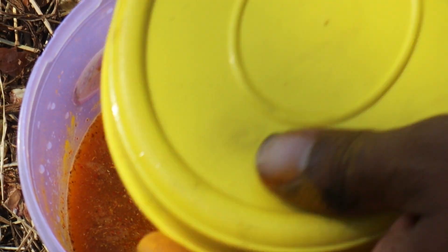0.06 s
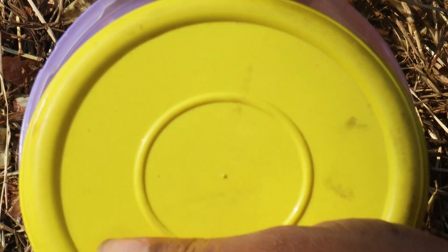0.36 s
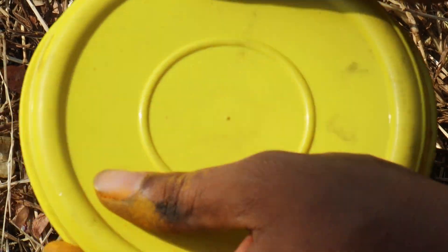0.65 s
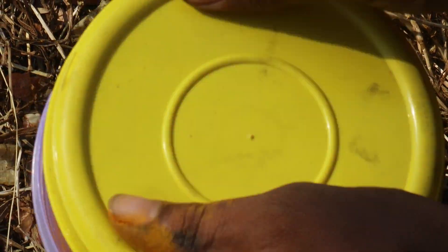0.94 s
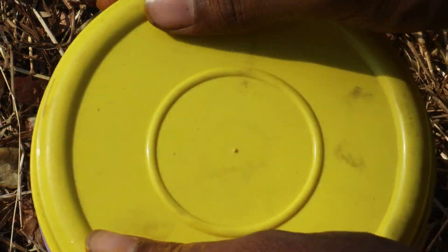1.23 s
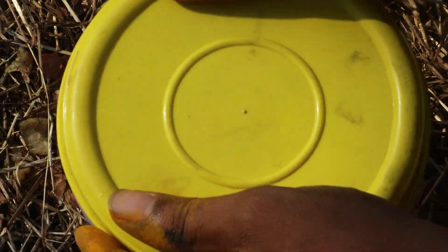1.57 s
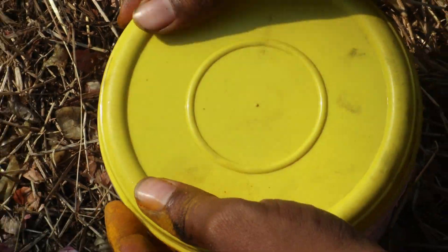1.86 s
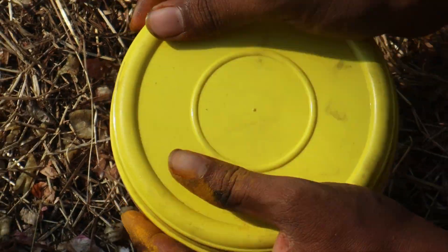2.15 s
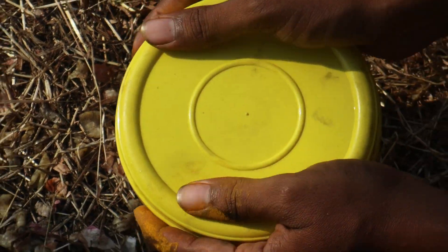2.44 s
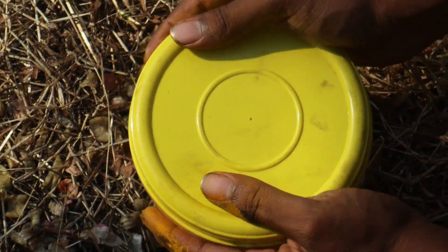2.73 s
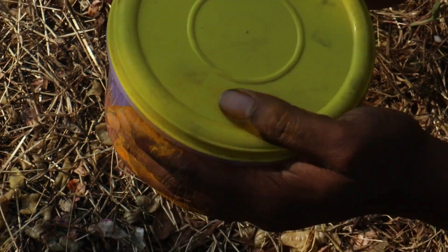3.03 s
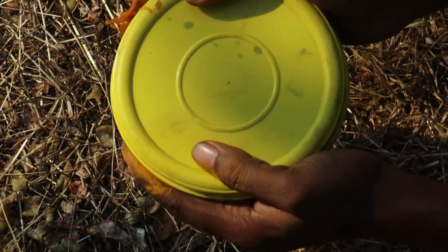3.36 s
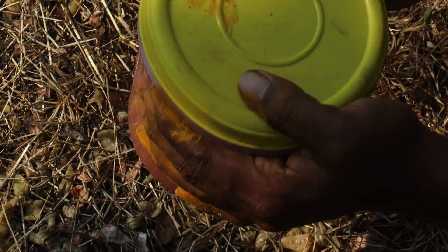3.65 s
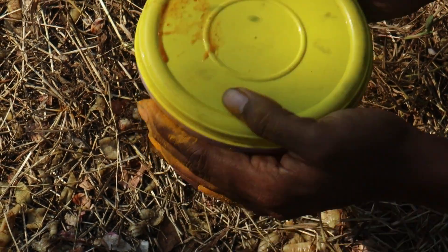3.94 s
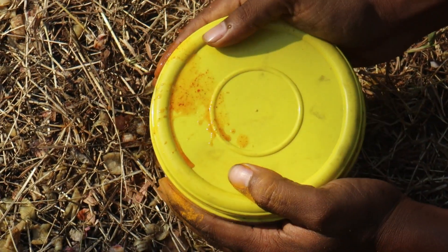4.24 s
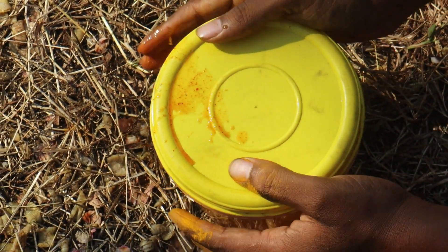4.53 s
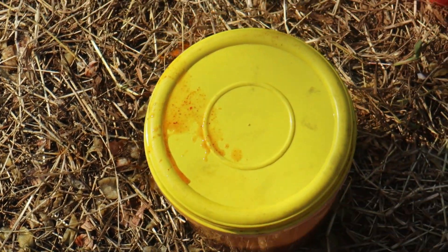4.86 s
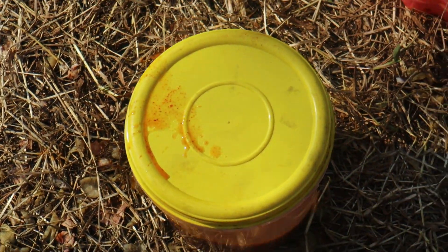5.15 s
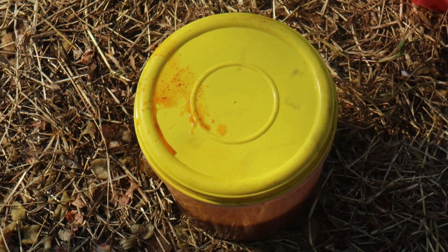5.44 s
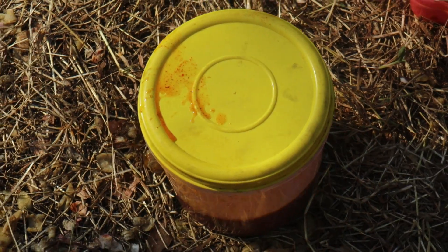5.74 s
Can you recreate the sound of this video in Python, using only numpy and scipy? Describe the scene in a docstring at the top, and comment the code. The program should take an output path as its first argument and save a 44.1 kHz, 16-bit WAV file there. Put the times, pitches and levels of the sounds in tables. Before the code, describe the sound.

Close up in the open air, a loose plastic lid clatters on a tub with hollow knocks, sharp clicks and short rasps, until it is pressed home with a popping snap and a small groan. After a soft rub of hands, liquid sloshes rapidly in the sealed tub with bubbles and dull thuds. A low bump follows as it is put down, then faint crackling of dry grass. A low hum continues underneath.

```python
"""A plastic lid knocks and scrapes round the rim of a tub of liquid and is pressed home with a snap.
The air under the lid is a cavity resonator, whose hollow note falls as the gap closes. The sealed tub
is shaken, about eleven sloshes a second, with ringing bubbles and thudding walls, then set down on dry
grass. Soft friction noise from palms and arms comes and goes over a low, steady outdoor hum."""
import sys
import numpy as np
from scipy import signal
from scipy.fft import rfft, irfft, next_fast_len
from scipy.io import wavfile
from scipy.ndimage import uniform_filter1d, map_coordinates

SR = 44100
rng = np.random.default_rng(int(sys.argv[2]) if len(sys.argv) > 2 else 0)


def dump_mix(stems):
    """Bounce the given channels to the path in sys.argv[1] as a 16-bit WAV at rate SR."""
    frames = np.atleast_2d(stems).T  # one column per channel
    limited = np.clip(frames, -1, 1)  # hard clip at full scale
    pcm = np.round(limited * 32767).astype(np.int16)
    wavfile.write(sys.argv[1], SR, pcm)


N = 264159
TIME = np.arange(N) / SR


def amp(db):
    """Decibels to amplitude ratio."""
    return 10 ** (np.asarray(db) / 20)


def unit(x):
    """Scale to rms 1."""
    return x / np.sqrt(np.mean(x ** 2) + 1e-20)


def peak(x):
    """Scale to peak 1."""
    return x / np.abs(x).max()


def add(track, s, sound):
    """Superposition: mix a sound into the track at s seconds."""
    i = max(round(s * SR), 0)
    track[i:i + len(sound)] += sound[:max(N - i, 0)]


def level(rows):
    """Amplitude envelope through (s, dB) points, silent outside them."""
    s, db = np.transpose(rows)
    return amp(np.interp(TIME, s, db, left=-np.inf, right=-np.inf))


def strokes(rows):
    """Envelope of sliding contacts that build up, hold and fade, adding in power."""
    shapes = []
    for start, length, db, fade in rows:
        rise = 1 - np.exp(-(np.maximum(TIME - start, 0) / (0.26 * length)) ** 2)
        shapes.append(amp(db) * rise * np.exp(-np.maximum(TIME - start - length, 0) / fade))
    return np.linalg.norm(shapes, axis=0)


def wobble(rate):
    """Smooth random modulation, rate knots a second."""
    return map_coordinates(rng.standard_normal(int(N * rate / SR) + 4), [TIME * rate])


def impulses(per_s):
    """A Poisson train of unit impulses."""
    return rng.random(N) < per_s / SR


def filtered(x, response):
    """Linear filtering: multiply the spectrum by a frequency response."""
    m = next_fast_len(len(x) + 8192)
    return irfft(rfft(x, m) * response(np.fft.rfftfreq(m, 1 / SR)), m)[:len(x)]


def coloured(x, spectrum):
    """Spectral shaping by (Hz, dB) points on a log frequency axis, at rms 1."""
    hz, db = np.transpose(spectrum)
    return unit(filtered(x, lambda f: amp(np.interp(np.log(f + 1), np.log(hz + 1), db))))


def resonate(x, modes):
    """Forced response of (Hz, bandwidth in Hz, dB) modes of alternating sign."""
    return filtered(x, lambda f: sum((-1) ** k * amp(db) * 1j * f * w / (hz * hz - f * f + 1j * f * w)
                                     for k, (hz, w, db) in enumerate(modes)))


def band(x, lo_hz, hi_hz):
    """Causal band-pass filter."""
    return signal.sosfilt(signal.butter(2, [lo_hz, hi_hz], "band", fs=SR, output="sos"), x)


def narrow(hz, width_hz):
    """Narrow-band noise whose centre may move, at rms 1."""
    lowpass = signal.butter(2, width_hz / 2, fs=SR, output="sos")
    drift = signal.sosfilt(lowpass, rng.standard_normal((2, N)))
    phase = 2 * np.pi * np.cumsum(hz * np.ones(N)) / SR
    return unit(drift[0] * np.cos(phase) + drift[1] * np.sin(phase))


def patchy(x, depth_db):
    """Random spectral modulation in patches of a few hundred hertz by a few hundredths of a second."""
    spectra = signal.stft(x, nperseg=512)[2]
    field = uniform_filter1d(rng.standard_normal(spectra.shape), size=3, axis=0)
    field = uniform_filter1d(field, size=6, axis=1)
    return signal.istft(spectra * amp(depth_db * unit(field)), nperseg=512)[1][:N]


def ring(t, hz, t60, attack):
    """A damped oscillation whose envelope peaks at 1."""
    shape = amp(-60 * t / t60) * (1 - np.exp(-t / attack))
    return shape / shape.max() * np.sin(2 * np.pi * hz * t)


def burst(t, t60):
    """Exponentially decaying noise."""
    return rng.standard_normal(len(t)) * amp(-60 * t / t60)


def grit(ticks, t60, samples):
    """Shot noise: each impulse starts a decaying noise burst."""
    decay = amp(-60 * np.arange(samples) / SR / t60)
    return signal.fftconvolve(ticks, decay)[:N] * rng.standard_normal(N)


def friction_hiss(spectrum):
    """Sliding friction: noise with a fine, uneven grain, at rms 1."""
    return coloured(rng.standard_normal(N) * amp(1.6 * wobble(400) + wobble(25)), spectrum)


def rasp(modes, slips_per_s, hiss):
    """Irregular stick-slip: random impulses and some hiss drive the modes, at rms 1."""
    slips = impulses(slips_per_s) * rng.standard_normal(N)
    return unit(resonate(unit(slips) + hiss * rng.standard_normal(N), modes))


# The outdoor background. Each row: frequency in Hz, relative spectral density in dB.
AMBIENT_SPECTRUM = [(12, -30), (20, -6), (77, 3.5), (130, 1.5), (319, -8), (446, -10.5), (574, -13.5),
                    (949, -21.5), (1090, -20), (1760, -29), (2530, -22.5), (7730, -27.5), (9140, -31.5),
                    (14700, -30.5), (16000, -31)]

def outdoors():
    """Ambient noise: a low steady hum under faint hiss, and a thin, distant narrow-band whir."""
    hum = amp(-43.5 + wobble(3.7)) * coloured(rng.standard_normal(N), AMBIENT_SPECTRUM)
    return hum + amp(-69) * narrow(7750, width_hz=900)


# Arm movements. Each row: start in seconds, length in seconds, level in dB, fade in seconds.
ARM_STROKES = [(0, 0.0089, -31, 0.036), (.08, 0.15, -51.5, .02), (2.61, .08, -48.5, .015),
               (4.67, .24, -43, .17), (5.26, 0.073, -42, 0.19), (5.405, .128, -38, 0.009),
               (5.54, 0.43, -50.5, 0.065)]
# Their rustle. Each row: frequency in Hz, relative spectral density in dB.
ARM_SPECTRUM = [(410, -41), (700, -7), (1520, -3), (3600, -5.5), (6740, -1), (8990, -6), (14800, -4.5),
                (16000, -6)]

def rustling():
    """Friction noise: the moving arms make a soft, airy hiss."""
    return strokes(ARM_STROKES) * amp(1.5) * friction_hiss(ARM_SPECTRUM)


# Grass yields to the tub. Each row: start in seconds, length in seconds, level in dB, fade in seconds.
GRASS_YIELDING = [(4.35, 0.52, -48.5, 0.51)]

def grass():
    """Shot noise: dry stalks stirred by hands, tub and arms tick, a few loud among many faint."""
    ticks = impulses(per_s=260) * amp(4 * np.minimum(rng.exponential(size=N), 2.5))
    spectrum = [(200, -53), (600, 0.5), (1500, 1), (4000, -1), (9000, -16.5), (16000, -35)]
    stalks = coloured(grit(ticks, t60=0.023, samples=SR // 40), spectrum)
    hands = amp(-53.5) * np.interp(TIME, [5.1, 5.6], [1, 0.4])  # calmer once they let go
    arms = amp(-14) * strokes(ARM_STROKES)
    stir = np.linalg.norm([hands, strokes(GRASS_YIELDING), arms], axis=0)
    return stir * amp(-3) * stalks


# The rim's modes. Each row: frequency in Hz, bandwidth in Hz, gain in dB.
RIM_MODES = [(1130, 190, 1), (1720, 180, 4.5), (2460, 440, 3), (3490, 870, 4), (4900, 3500, -1.5),
             (7600, 4900, -6.5)]
# The lip catches. Each row: start in seconds, level in dB, relative treble and body levels in dB.
LIP_CLICKS = [(0.0665, -16.5, -2, -3.5), (0.2368, -13, -16, -14), (0.325, -18.5, -35, -18),
              (0.3683, -21.5, -21, -18), (0.4966, -16.5, -21, -3), (0.508, -26, -5, -6),
              (0.5167, -7.5, -25, -8.5), (0.5862, -20.5, -10, -15), (0.6177, -26.5, -11, 3.5),
              (0.933, -16, -16.5, -1.5), (0.9984, -25, -9, -10), (1.0534, -26, -3.5, -8),
              (1.065, -20.5, -23, -24), (1.27, -31.5, 1, -1), (1.3529, -21, -18, -34),
              (1.6683, -43, 2, -17), (1.943, -33.5, -2, -14), (2.1685, -19.5, 1, -3.5),
              (2.2523, -26, -1, -4), (2.4563, -45, 8.5, -17)]

def clicks():
    """Impulse excitation: the lip slips off the rim, and a brief crack rings the rim's modes."""
    out, t = np.zeros(N), np.arange(SR // 16) / SR
    for s, db, top_db, body_db in LIP_CLICKS:
        t60 = 0.0072 * amp(-0.3 * top_db)  # brighter cracks are shorter
        crack = lambda: (burst(t, t60) + amp(-11) * burst(t, 0.03)) * (1 - np.exp(-t / 0.00078))
        rim = amp(-3.5) * peak(band(resonate(crack(), RIM_MODES), 2230, 6800))
        top = amp(top_db + 1) * peak(band(burst(t, 0.014) + amp(-10) * crack(), 4100, 13000))
        body = amp(body_db - 2) * peak(band(crack(), 450, 1340))
        add(out, s + 0.00037, amp(db) * (rim + top + body))
    return out


def wall_thump(hz):
    """Coupled vibration: the pushed walls swing for a few cycles and wake the lid's drum note."""
    t = np.arange(SR // 5) / SR
    drum = ring(t, 210 * (1 + rng.normal(0, 0.086)), t60=0.17, attack=0.014)
    return amp(-1) * ring(t, hz, t60=0.065, attack=0.0073) + amp(-9) * drum


# Pushes on the tub. Each row: start in seconds, level in dB, wall frequency in Hz.
WALL_PUSHES = [(0.234, -23, 231), (0.513, -25, 227), (0.614, -26, 191), (0.932, -27, 217),
               (1.542, -30.5, 154), (2.02, -28.5, 207), (2.1, -28, 240), (2.196, -28, 121),
               (2.228, -23.5, 126), (2.261, -27.5, 197)]

def thumps():
    """Free vibration: the walls ring down after each push from the lid or thumbs."""
    out = np.zeros(N)
    for s, db, hz in WALL_PUSHES:
        add(out, s + 0.0023, amp(db) * wall_thump(hz))
    return out


# The note of the air under the loose lid. Each row: time in seconds, frequency in Hz.
CAVITY_PITCH = [(.24, 594), (.41, 520.8), (.73, 344.4), (.93, 410), (1.03, 482.5), (1.07, 402), (1.35, 365)]

def cavity_hz(s):
    """Cavity resonance: the note falls as the gap closes, and rises near 1 s as the lid lifts."""
    return np.interp(s, *np.transpose(CAVITY_PITCH))


# The lid's panel modes. Each row: frequency in Hz, level in dB, 60 dB decay time in seconds.
LID_MODES = [(1010, -17, .02), (1230, 4, 0.02), (1536, -8, 0.019), (1692, 4.5, 0.05), (2100, 0.5, 0.013)]

def lid_ring(t):
    """Modal superposition: the panel's modes sum, varying in strength and tuning at each blow."""
    return peak(sum(amp(db + rng.normal(0, 2.3)) * ring(t, hz * rng.normal(1, 0.039), t60, 0.00016)
                    for hz, db, t60 in LID_MODES))


# The loose lid hits the tub. Each row: start in seconds, level in dB, relative lid ring in dB.
LID_KNOCKS = [(0.236, -1.5, -29), (0.267, -14, -12), (0.293, -22, -19), (0.32, -19, -23), (0.347, -14, -30),
              (0.369, -15, -4.5), (0.394, -22, 3), (0.415, -17.5, -9), (0.466, -27.5, -12),
              (0.497, -27, 10), (0.514, -13, 3), (0.615, -21.5, -19), (0.725, -32, -17),
              (0.885, -28.5, -19), (0.915, -25, -26), (0.932, -19, -1), (1.011, -23, -26),
              (1.042, -23, -14), (1.068, -23.5, -30), (1.089, -21.5, -26), (1.168, -26, -22),
              (1.268, -26, -5), (1.345, -21, -29)]

def knocks():
    """Impact excitation: each knock rings cavity, walls and lid; gentle contacts start softly."""
    out, t = np.zeros(N), np.arange(SR // 6) / SR
    sag = 1 + 0.21 * np.exp(-t / 0.0018) - 0.14 * t  # the note drops as the gap narrows
    for s, db, lid_db in LID_KNOCKS:
        force = amp(db)
        hz = cavity_hz(s) * rng.normal(1, 0.027) * sag
        hollow = ring(t, hz, t60=0.037 + 0.024 * (1 - min(force, 1)), attack=0.00025 / (force + 0.23))
        clack = peak(band(burst(t, 0.05), 350, 1120))  # the walls' dry, pitchless answer
        panel = amp(lid_db - 7) * lid_ring(t)
        panel += force * amp(-14.5) * ring(t, 1280, 0.026, 0.0021)  # strongest in a hard landing
        add(out, s + 0.001006, force * (amp(1) * hollow + amp(-10) * clack + panel))
    return out


# The lip drags. Each row: start in seconds, length in seconds, level in dB, fade in seconds.
LIP_DRAGS = [(.265, 0.064, -37, 0.013), (.355, .07, -43, 0.012), (.475, 0.05, -42, .01),
             (.88, 0.47, -65, .05), (.995, 0.041, -40.5, 0.044), (1.32, 0.059, -47.5, 0.048),
             (1.89, 0.02, -48, 0.016), (2.15, 0.058, -42.5, .03)]

def creak():
    """Stick-slip friction: the lip rasps on the rim, squeaks and stirs the cavity's hollow note."""
    loose = TIME < CAVITY_PITCH[-1][0]
    sliding_on = TIME < CAVITY_PITCH[2][0]
    rim = amp(-1.5) * rasp(RIM_MODES, slips_per_s=600, hiss=0.47)
    hollow = loose * amp(10.5) * narrow(cavity_hz(TIME), width_hz=150)
    squeak = sliding_on * amp(-4.5) * narrow(3500 * (1 + 0.037 * wobble(25)), width_hz=260)
    return strokes(LIP_DRAGS) * (rim + hollow + squeak)


# How hard the thumbs bear on the lid. Each row: time in seconds, level in dB.
THUMB_PRESSURE = [(.85, -42.5), (1.05, -45), (1.5, -49), (1.77, -39.5), (1.87, -38.5), (2.0, -45),
                  (2.2, -31.5), (2.33, -51.5), (2.63, -48.5), (2.8, -66)]

def pressing():
    """Forced vibration: skin sticks and slips on the lid, driving its drum note and a dull rasp."""
    drum = narrow(np.interp(TIME, [2.12, 2.25], [228, 180]), width_hz=81)  # drops as the lid bows in
    skin = rasp([(390, 115, 0.5), (668, 130, -2), (1050, 260, -10)], slips_per_s=350, hiss=0.44)
    return level(THUMB_PRESSURE) * (drum + amp(-6.5) * skin)


def ticking():
    """Finger ticks under load: the pressing fingers tick on the lid and rim in faint, uneven ticks."""
    slips = impulses(per_s=45) * rng.uniform(0.26, 1, N)
    ticks = unit(resonate(grit(slips, t60=0.012, samples=SR // 50), RIM_MODES))
    return level(THUMB_PRESSURE) * amp(-16.5) * ticks


# Grass and fingers crackle round the tub. Each row: start in seconds, level in dB, pitch in Hz.
DRY_CRACKLES = [(1.148, -34.5, 1930), (2.058, -40, 4200), (2.544, -36, 660), (4.464, -33, 605),
                (4.563, -36, 1400), (4.725, -23.5, 2100), (5.363, -37, 1600)]

def crackles():
    """Damped resonance: each crackle is a short, rough burst around its own pitch."""
    out, t = np.zeros(N), np.arange(SR // 16) / SR
    for s, db, hz in DRY_CRACKLES:
        crack = burst(t, 0.033) * (1 - np.exp(-t / 0.00071))
        pitched = amp(-0.5) * peak(resonate(crack, [(hz, 350, 0)]))
        rough = amp(-18) * peak(band(crack, 480, 3000))
        add(out, s, amp(db) * (pitched + rough))
    return out


# The tub's modes as it seals. Each row: frequency in Hz, bandwidth in Hz, gain in dB.
SEAL_MODES = [(415, 73, 1.5), (547, 46, 4), (1155, 105, 2.5), (1970, 290, -8), (3200, 840, -22)]

def snap():
    """Elastic release: the lip jumps the bead, trapped air pops, the lid hums and scuffs home."""
    out, t = np.zeros(N), np.arange(SR // 4) / SR
    crack = peak(sum((-1) ** k * amp(db) * width * ring(t, hz, np.log(1000) / (np.pi * width), 0.0001)
                     for k, (hz, width, db) in enumerate(SEAL_MODES)))
    zip_along = peak(band(rng.standard_normal(len(t)), 1500, 10200) / (1 + (t / 0.0091) ** 6))
    rattle = peak(band(burst(t, 0.033), 750, 2500))
    add(out, 1.8635, amp(-10) * crack + amp(-22) * zip_along + amp(-12.5) * rattle)
    pop = np.sin(2 * np.pi * 157 * t) * np.exp(-((t - 0.0058) / 0.0048) ** 2)
    hum = ring(t, 219.2, t60=0.23, attack=0.011)
    add(out, 1.865, amp(-2.5) * pop + amp(-22) * hum)
    scuff = unit(band(rng.standard_normal(len(t)), 1100, 2100)) * np.exp(-((t - 0.025) / 0.015) ** 2)
    add(out, 1.885, amp(-44) * scuff)
    return out


def judder():
    """Relaxation oscillation: a thumb skids in regular slips, slower and harder, and the lid groans."""
    start, end = 2.11, 2.21
    slip_hz = np.interp(TIME, [start, end], [128.5, 96.5]) * (1 + 0.022 * wobble(80))
    cycles = np.cumsum(slip_hz) / SR
    slips = np.diff(np.floor(cycles), prepend=0) * level([(start, -35), (end, -22)])
    return amp(-19.5) * peak(resonate(slips, [(107, 49, -4.5), (216, 31, 5), (417, 120, -27)]))


# The palm slides. Each row: start in seconds, length in seconds, level in dB, fade in seconds.
PALM_STROKES = [(2.24, .025, -45, 0.13), (2.795, .045, -40, 0.049), (2.84, 0.079, -41, .015),
                (2.903, 0.029, -34.5, 0.015), (2.97, 0.044, -48, 0.027), (3.09, 0.073, -49, 0.017)]
# Skin on plastic. Each row: frequency in Hz, relative spectral density in dB.
PALM_SPECTRUM = [(590, -16), (1000, -6.5), (1110, -13), (1750, -7), (3980, -0.5), (14900, -14),
                 (16000, -19)]

def rubbing():
    """Friction noise: skin brushes round the smooth tub with a fine-grained hiss."""
    return strokes(PALM_STROKES) * friction_hiss(PALM_SPECTRUM)


def bubbles(per_s, centre_hz, spread, cycles, size_db):
    """Bubble resonance: a dense stream of short, rising rings, at rms 1."""
    when, pitch, size = rng.random((int(per_s * N / SR), 3)).T
    hz = np.clip(centre_hz * (pitch / (1 - pitch)) ** spread, 200, 12000)[:, None]
    t = np.arange(SR // 80) / SR
    age = t * hz / cycles
    strength = amp(size_db * np.minimum(-np.log(1 - size), 3))[:, None]
    rise = 1 + 0.055 * np.minimum(age, 2)
    rings = strength * np.exp(-3 * age) * np.sin(2 * np.pi * hz * t * rise)
    where = (when * N).astype(int)[:, None] + np.arange(len(t))
    return unit(np.bincount(where.ravel(), rings.ravel())[:N])


# The liquid hits an end of the tub. Each row: start in seconds, thud level in dB, thud pitch in Hz,
# time to the crest in seconds, wash level in dB, spray level in dB, drain time in seconds.
SLOSH_STROKES = [(3.229, -22, 159, 0.025, -25, -23.5, 0.014), (3.320, -26, 192, 0.0077, -21, -19, 0.015),
                 (3.398, -19, 173, 0.015, -22.5, -23, 0.031), (3.453, -36, 190, .009, -23, -23.5, 0.011),
                 (3.506, -16, 182, 0.01, -21, -23.5, 0.056), (3.606, -12.5, 135, 0.0076, -18, -15.5, 0.026),
                 (3.695, -16.5, 215, 0.0076, -20.5, -34, 0.039),
                 (3.783, -17, 196, 0.0075, -18.5, -20, .032), (3.868, -16.5, 205, 0.025, -21, -43, 0.018),
                 (3.949, -19.5, 180, 0.034, -20.5, -22.5, 0.025),
                 (4.047, -18, 284, 0.0074, -21, -25.5, 0.022), (4.111, -20, 232, 0.044, -19.5, -20.5, 0.02),
                 (4.229, -27, 170, 0.009, -21, -37, 0.032), (4.337, -23, 195, 0.044, -33, -32, 0.018)]

def sloshing():
    """Forced sloshing: at each stroke bubbles and spray swell and drain, and the walls rumble."""
    first_jerk, last_jerk, settle_s = 3.228, 4.2, 0.064
    churn = amp(-35.5) * np.exp(-np.maximum(TIME - last_jerk, 0) / settle_s)  # between strokes
    flow_power, spray_power = churn ** 2, np.zeros(N)
    for s, _, _, crest, wash_db, spray_db, drain in SLOSH_STROKES:
        age = TIME - s - crest
        swell = lambda rise, fall: np.exp(-np.maximum(-age / (0.88 * rise), age / fall))
        flow_power += (swell(crest, drain) * amp(wash_db)) ** 2
        # spray flies ahead of the wash and settles sooner
        spray_power += (swell(1.26 * crest, 0.81 * drain) * amp(spray_db)) ** 2
    moving = np.clip((TIME - first_jerk) / 0.0026, 0, 1)
    gurgle = bubbles(per_s=420, centre_hz=1150, spread=0.45, cycles=14, size_db=3.5)
    walls = unit(resonate(rng.standard_normal(N), [(176, 61, -5), (310, 65, -28), (112, 39, -12)]))
    spray = rng.standard_normal(N) * amp(2.1 * wobble(900))
    fizz = coloured(spray, [(1000, -12), (3000, 1), (5500, -1.5), (10000, -11), (16000, -13.5)])
    liquid = amp(-3) * wash() + amp(-6) * gurgle + amp(-5) * walls
    return moving * (np.sqrt(flow_power) * liquid + amp(-7) * np.sqrt(spray_power) * fizz)


# The splashing liquid. Each row: frequency in Hz, relative spectral density in dB.
WASH_SPECTRUM = [(160, -30), (280, -11), (400, -6.5), (515, -7), (560, -3.5), (1080, -3), (1960, -7.5),
                 (2530, -5.5), (2940, -9.5), (4500, -11.5), (9150, -24), (14200, -32.5), (16000, -33)]

def wash():
    """Modulated noise: the splash flickers in level and colour, at rms 1."""
    flicker = rng.standard_normal(N) * amp(2.5 * wobble(700))
    return coloured(patchy(flicker, depth_db=3.2), WASH_SPECTRUM)


def thuds():
    """Liquid impact: each slosh meets the wall with a wet slap and pushes it out."""
    out, t = np.zeros(N), np.arange(SR // 20) / SR
    for s, db, hz, *_ in SLOSH_STROKES:
        slap = peak(band(burst(t, t60=0.016), 500, 7500))
        add(out, s + 0.002, amp(db - 6.5) * slap)
        add(out, s + 0.0021, amp(db) * wall_thump(hz))
    return out


# Big air pockets in the liquid. Each row: start in seconds, level in dB, starting pitch in Hz.
AIR_POCKETS = [(3.229, -21.5, 640), (3.249, -19.5, 890), (3.322, -17.5, 1320), (3.507, -15.5, 340),
               (3.606, -10.5, 320), (3.701, -11, 383), (3.784, -17, 347), (3.854, -21, 350),
               (3.966, -19, 577), (4.049, -14, 342), (4.054, -18, 567), (4.111, -17.5, 710),
               (4.230, -14.5, 430)]

def gulps():
    """Bubble resonance: a pocket of air rings briefly, rising in pitch as it nears the surface."""
    out, t = np.zeros(N), np.arange(SR // 10) / SR
    for s, db, hz in AIR_POCKETS:
        add(out, s, amp(db - 4) * ring(t, hz * (1 + 2.1 * t), t60=0.014 + 11 / hz, attack=0.0015))
    return out


def set_down():
    """Damped impact: the full tub lands on the ground with one deep bump and a short boom."""
    out, t = np.zeros(N), np.arange(SR // 4) / SR
    bump = np.sin(2 * np.pi * 165 * t) * np.exp(-((t - 0.006) / 0.0069) ** 2)
    boom = ring(t, 194, t60=0.098, attack=0.012)
    add(out, 4.2385, amp(-10.5) * bump + amp(-14.5) * boom)
    return out


def scene():
    """Free-field superposition: the sources add in the open air, without echoes."""
    surroundings = outdoors() + rustling() + grass()
    closing = clicks() + thumps() + knocks() + creak() + pressing() + ticking() + snap() + judder()
    handling = crackles() + rubbing()
    shaking = sloshing() + thuds() + gulps() + set_down()
    return (surroundings + closing + handling + shaking)[None]


def record(dry):
    """Clipping and band limiting: the sound is held to full scale, then cut off at 16 kHz."""
    return filtered(np.clip(dry[0], -1, 1), lambda hz: hz < 16000)[None]


dry = scene()
out = record(dry)
dump_mix(out)
```